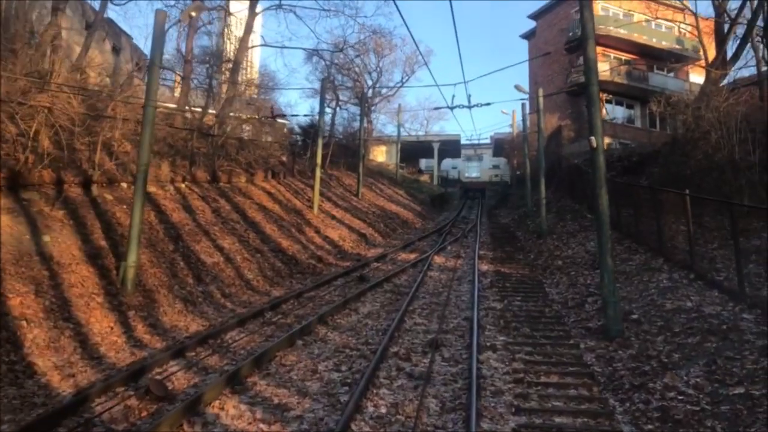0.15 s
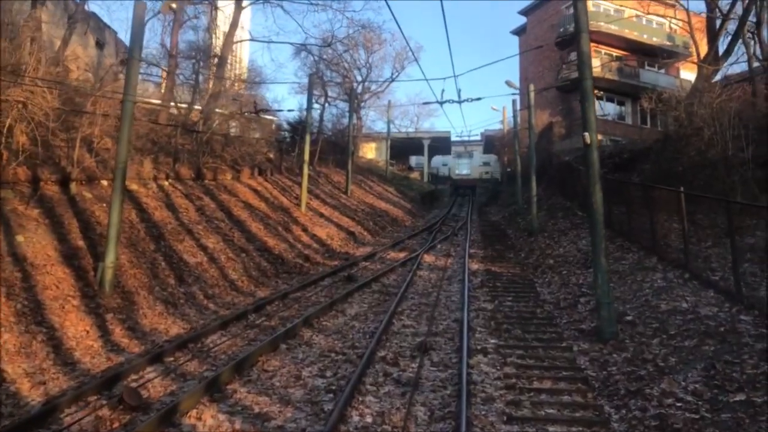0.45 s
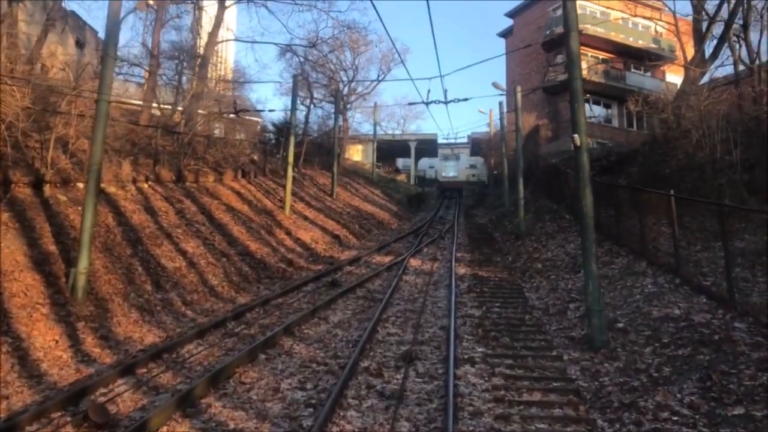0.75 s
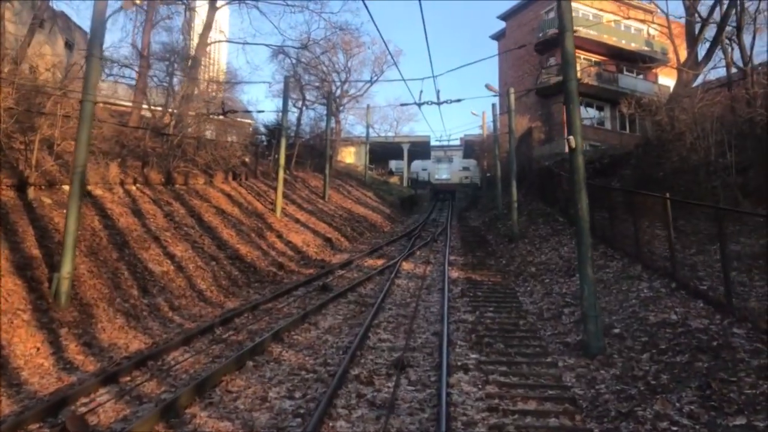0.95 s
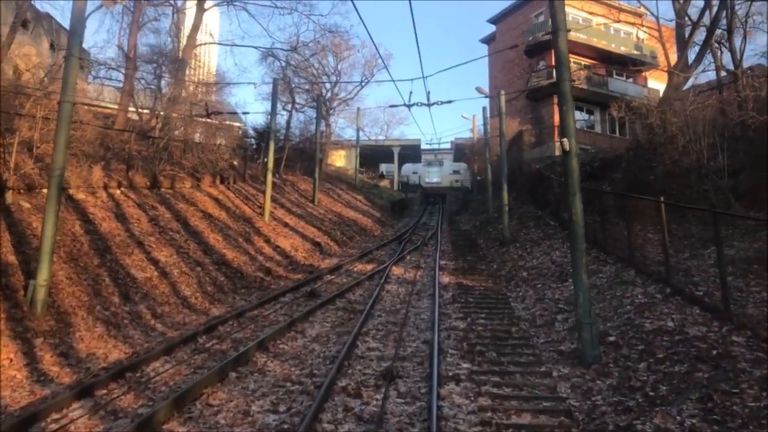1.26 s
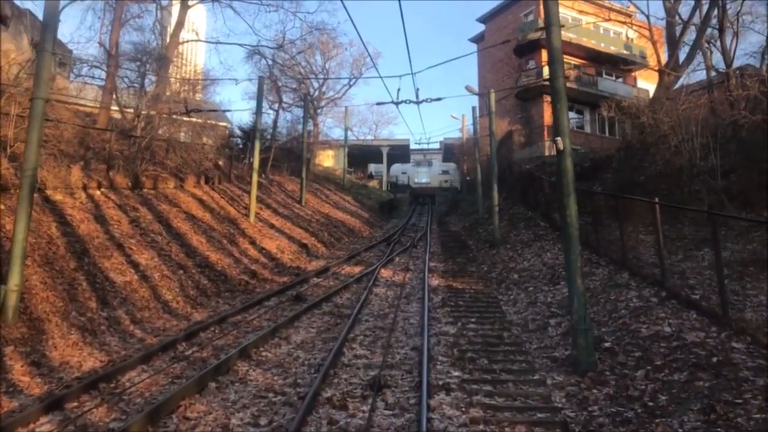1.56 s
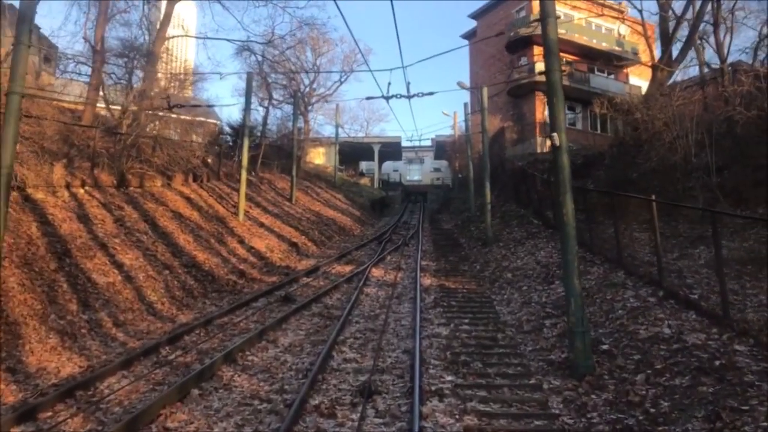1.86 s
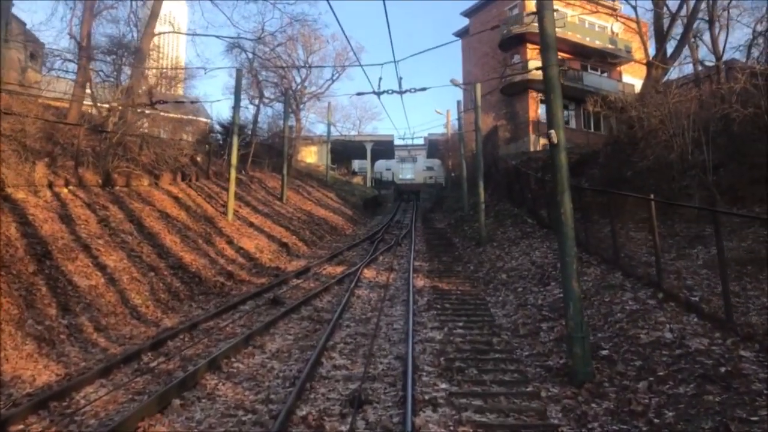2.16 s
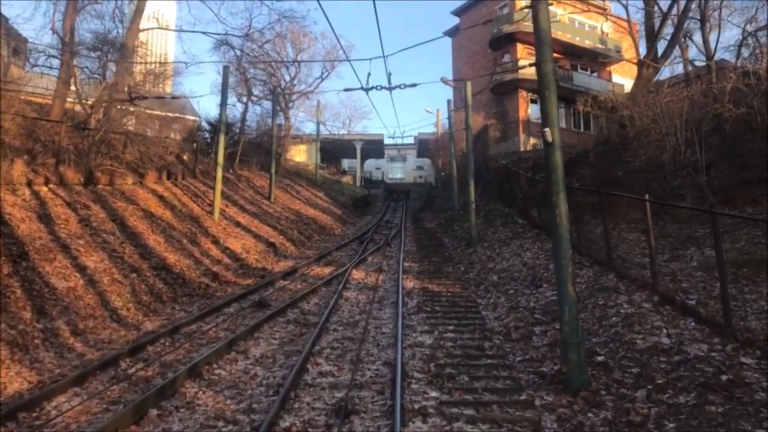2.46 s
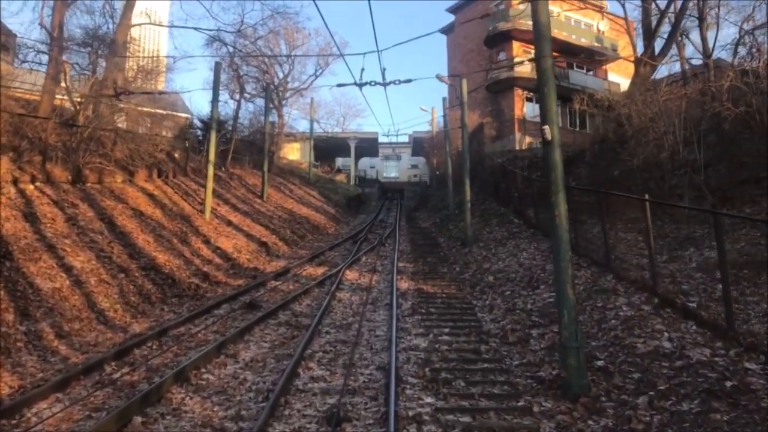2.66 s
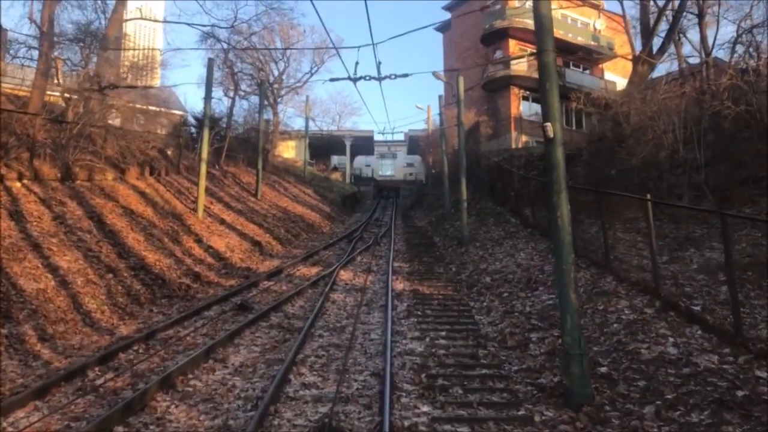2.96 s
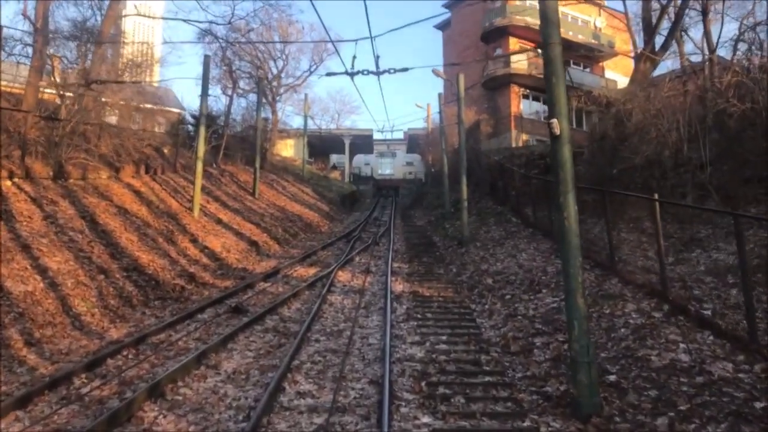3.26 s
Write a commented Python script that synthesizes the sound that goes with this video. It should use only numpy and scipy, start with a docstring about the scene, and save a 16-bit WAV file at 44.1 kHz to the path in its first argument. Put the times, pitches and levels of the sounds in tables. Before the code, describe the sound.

Funicular car rolling on rails, deep booming rumble with loose panel clatter, heard inside the cab

```python
"""Inside the front cab of a funicular car rolling along its track.
The wheels shake the body into a low rumble, resonant noise that swells and booms on bumps.
Loose panels knock and clatter in short bouts and jolts make the walls growl: random touches and noise ring modes.
Small fittings rattle brightly, as dense touches, over a fluttering noise of rolling and air.
Short unsteady tones, some like squeaks, sound faintly now and then: sines of wandering pitch and level."""
import sys
import numpy as np
from scipy import signal
from scipy.fft import rfft, irfft, next_fast_len
from scipy.io import wavfile
from scipy.ndimage import uniform_filter1d

SR = 44100
rng = np.random.default_rng(int(sys.argv[2]) if len(sys.argv) > 2 else 0)


def dump(signal):
    """Clip the signal to [-1, 1] and save it as 16-bit WAV at the path in sys.argv[1]."""
    limited = np.clip(np.atleast_2d(signal).T, -1, 1)
    pcm = np.round(limited * 32767).astype(np.int16)
    wavfile.write(sys.argv[1], SR, pcm)


N = 150381  # samples, about 3.4 s

# Spectrum of the car body's drone. Each row: frequency in Hz, relative density in dB per Hz.
BODY_SPECTRUM = [(30, -5.5), (42, 8), (62, 2), (85, 4.5), (115, -2), (160, -11), (250, -22), (400, -26),
                 (550, -50.5)]
# Resonances of the cab. Each row: centre in Hz, width in Hz of the narrower of two passes, level in dB.
CAB_RESONANCES = [(42.6, 22, -33), (61.2, 17, -33), (87.5, 22.6, -33), (207.6, 21, -41)]
BODY_DB, BODY_EVENNESS = -20.5, 0.45  # evenness: 0 leaves the swells of the noise, 1 flattens them
RUMBLE_LOW_CUT_HZ = 32

# Bumps that make the body boom. Each row: start in seconds, length in seconds, pitch in Hz, boom level in dB.
BUMPS = [(0.074, 0.027, 52, -21), (0.524, 0.032, 68, -16), (0.752, 0.11, 54, -14.5), (1.096, 0.11, 88, -19),
         (1.296, 0.021, 100, -13), (1.393, 0.038, 73.94, -16), (2.083, 0.1, 58, -18.5),
         (2.241, 0.038, 62, -17.5), (2.519, 0.065, 70, -18), (2.609, 0.075, 84.72, -8.5),
         (3.073, 0.039, 66, -16), (3.225, 0.081, 56, -14.5)]
BUMP_ATTACK_S, BUMP_DECAY_S = 0.01, 0.029
BUMP_WANDER_HZ, BUMP_SWELL = 14.23, 3.2  # spread of the pitch; gain of the drone beside the boom

# Spectrum of wheels on rails and air past the cab. Each row: frequency in Hz, relative density in dB per Hz.
ROLLING_SPECTRUM = [(200, -4), (380, 4), (550, -1), (850, 0), (1650, -7), (2200, -14), (4300, -20),
                    (4900, -29), (5600, -25), (6700, -31), (7800, -32), (9400, -27), (11000, -30),
                    (15900, -32)]
# Strength of the rush, before its flutter. Each row: time in seconds, level in dB.
ROLLING_LEVEL = [(0, -44), (0.299, -51.5), (.55, -41), (.92, -46.5), (1.35, -44.5), (1.63, -52.5),
                 (1.87, -49.5), (2.2, -45.5), (2.65, -41), (3.0, -49.5), (3.2, -48.5), (3.41, -44)]
ROLLING_FLUTTER_DB = 1.8
# Stray ticks of the fittings; TICK_DB is relative to the rush.
TICKS_PER_S, TICK_DECAY_S, TICK_SPREAD_DB, TICK_DB = 70, 0.0026, 3.5, -22.5

# Bouts of rattling. Each row: start in seconds, length in seconds, drive level in dB,
# extra drive of the sizzle in dB.
RATTLES = [(0.069, 0.0024, -49.5, 9), (0.281, 0.0057, -54, 9.5), (0.4, 0.03, -45, -9),
           (0.417, 0.045, -49.5, -3), (0.515, 0.013, -44.5, -4), (0.556, 0.061, -50, 1.5),
           (0.622, 0.0058, -46, -1.5), (0.635, 0.022, -63, 18), (0.714, 0.0073, -64.5, 21),
           (1.107, 0.003, -50.5, -2), (1.132, 0.025, -59, 10.5), (1.353, 0.032, -65, 16.5),
           (1.476, 0.011, -65, 16.5), (1.579, 0.04, -61, 8.5), (1.731, 0.029, -59.5, 4.5),
           (2.308, 0.072, -60.5, -4), (2.481, 0.0087, -44, -3), (2.507, 0.017, -52, -1.5),
           (2.601, 0.017, -46, -2), (2.73, 0.0066, -50.5, 1.5), (2.942, 0.028, -71.5, 17.5),
           (3.142, 0.0053, -57.5, 5), (3.224, 0.039, -58.5, 8.5), (3.273, 0.07, -51.5, -12)]
RATTLE_ATTACK_S, RATTLE_DECAY_S, RATTLE_PER_S, RATTLE_SPREAD_DB = 0.0042, 0.0069, 5100, -4
RATTLE_TAIL_S, RATTLE_TAIL_DB = 0.065, -9.5  # tail level relative to the touches
RATTLE_FLUTTER_DB, SIZZLE_FROM_HZ = 1.8, 9100
# Spectrum of the small fittings. Each row: frequency in Hz, relative density in dB per Hz.
FITTING_SPECTRUM = [(600, -12), (1800, 3), (3300, 6), (4300, 3), (5000, -1), (6700, 1), (8000, -3),
                    (9400, -2), (10700, -6), (12500, -5), (15900, -4)]

# Bouts of panel clatter. Each row: start in seconds, length in seconds, drive level in dB.
CLATTERS = [(.116, 0.058, -39.5), (.328, 0.029, -42.5), (.402, 0.035, -36), (.483, 0.084, -41),
            (.625, 0.046, -37), (.737, 0.0072, -39), (.828, 0.08, -42), (1.005, 0.012, -40.5),
            (1.11, 0.084, -47), (1.19, 0.11, -44.5), (1.441, 0.017, -40.5), (1.52, 0.031, -47),
            (1.695, 0.016, -42.5), (1.765, 0.011, -44.5), (1.909, 0.026, -42), (1.965, 0.018, -43.5),
            (2.047, 0.0068, -36), (2.225, 0.018, -46), (2.302, 0.024, -38), (2.49, 0.04, -41),
            (2.574, 0.042, -36.5), (2.685, 0.053, -43), (2.807, 0.015, -40.5), (2.87, 0.022, -42.5),
            (2.96, 0.025, -49), (3.044, 0.093, -45.5), (3.232, 0.12, -40.5), (3.284, 0.035, -36),
            (3.37, 0.055, -50)]
CLATTER_ATTACK_S, CLATTER_DECAY_S, CLATTER_PER_S, CLATTER_SPREAD_DB = 0.0016, 0.032, 1300, 0
# Spectrum of the panels. Each row: frequency in Hz, relative density in dB per Hz.
PANEL_SPECTRUM = [(150, -20), (350, 2), (550, -4), (850, 0), (1200, -4), (1650, -6), (2200, -15),
                  (3200, -22), (4300, -24), (4900, -34), (6700, -38), (16000, -44)]
# Modes of the panels. Each row: frequency in Hz, width in Hz, peak gain in dB beside the direct shaking.
PANEL_MODES = [(494, 10, 0), (987, 6.3, -5.5), (1312, 13, -1), (1626, 16, 0), (2385, 38, 0.5),
               (3266, 17, 4.5)]

# Single knocks of a loose panel. Each row: start in seconds, ring frequency in Hz, level in dB.
KNOCKS = [(0.13, 1080, -44), (0.856, 1140, -36), (0.872, 940, -35), (1.208, 1000, -39.5), (1.37, 1126, -42),
          (2.063, 994, -39.5), (2.328, 938, -34), (2.525, 940, -36), (2.578, 1623, -39)]
KNOCK_DECAY_S, KNOCK_CRACK_S = 0.0094, 0.005
KNOCK_OVERTONE, KNOCK_OVERTONE_DB = 1.5, -1.5  # frequency ratio and level relative to the first mode

# Short unsteady tones, some like squeaks. Each row: start in seconds, length in seconds, pitch in Hz, level in dB.
TONES = [(0.212, .062, 2870, -55.5), (0.246, 0.02, 1790, -54), (.25, .018, 2400, -59),
         (.55, 0.12, 15400, -59), (0.708, .03, 15700, -48), (0.822, 0.018, 2100, -47),
         (.842, .02, 3030, -50.5), (.845, .018, 2450, -51), (1.316, 0.099, 15140, -53.5),
         (1.47, 0.028, 2900, -55.5), (2.455, 0.014, 1630, -44), (2.538, .013, 2760, -50),
         (2.67, 0.035, 1640, -44.5), (2.688, .014, 2570, -52), (2.71, .04, 1780, -46),
         (3.026, .055, 2875, -47), (3.041, 0.092, 1785, -48)]
TONE_ATTACK_S, TONE_DECAY_S = 0.01, 0.017
TONE_WOBBLE_HZ, TONE_ROUGH_DB = 42, 3.8  # spreads of pitch and level

# Jolts that make the cab walls judder. Each row: start in seconds, length in seconds, centre in Hz, level in dB.
JUDDERS = [(0.49, 0.17, 166, -33.5), (0.821, 0.07, 204, -29), (1.312, 0.028, 186, -29.5),
           (2.597, 0.06, 384, -38), (3.256, 0.031, 193, -36)]
JUDDER_WIDTH_HZ = 90  # width of each of two passes

CUTOFF_HZ = 15900


def from_db(db):
    """Amplitude gain is ten to the power of decibels over twenty."""
    return 10 ** (np.asarray(db) / 20)


def rms_one(x):
    """Normalisation: dividing by the root mean square gives unit power."""
    return x / np.sqrt(np.mean(x ** 2) + 1e-20)


def seconds():
    """Sampled time: each sample lies one period after the last."""
    return np.arange(N) / SR


def coloured(x, points):
    """Spectral shaping: x takes a smooth colour that falls away beyond both ends, at unit power."""
    hz, db = np.transpose(points)
    size = next_fast_len(N + SR // 2)
    f = np.maximum(np.fft.rfftfreq(size, 1 / SR), 1)
    skirts = (np.minimum(f / hz[0], 1) * np.minimum(hz[-1] / f, 1)) ** 2
    colour = from_db(np.interp(np.log(f), np.log(hz), db))
    return rms_one(irfft(rfft(x, size) * skirts * colour, size)[:N])


def drift(rate):
    """Low-pass noise: two equal poles at rate (Hz) leave a random wander of spread 1."""
    r = np.exp(-2 * np.pi * rate / SR)
    noise = rng.standard_normal(N + SR)
    # the first second lets the filter settle
    return rms_one(signal.lfilter([1], [1, -2 * r, r * r], noise)[SR:])


def resonate(x, hz, width):
    """Resonance: a pole pair passes a band of the given width with unit gain at its top."""
    r = np.exp(-np.pi * width / SR)
    zeros = np.array([1, 0, -1]) * (1 - r * r) / 2
    poles = [1, -2 * r * np.cos(2 * np.pi * hz / SR), r * r]
    return signal.lfilter(zeros, poles, x)


def envelope(start, length, attack, decay):
    """Damped excitation: a linear rise, a hold until length after the start, an exponential decay."""
    t = seconds() - start
    return np.clip(t / attack, 0, 1) * np.exp(-np.clip((t - length) / decay, 0, 20))


def bouts(rows, attack, decay):
    """Superposition of incoherent sources: the powers of overlapping bouts add."""
    powers = [(from_db(db) * envelope(s, length, attack, decay)) ** 2 for s, length, db in rows]
    return np.sqrt(sum(powers))


def contacts(per_s, spread_db):
    """Impulse noise: touches of random sign at random instants; spread_db makes their strength uneven."""
    strengths = from_db(spread_db * np.minimum(rng.exponential(1, N), 4))
    signed = strengths * rng.choice([-1, 1], N)
    return rms_one(signed * (rng.random(N) < per_s / SR))


def panel_ring(x):
    """Modal response: the direct shaking plus the ring of each panel mode."""
    return x + sum(from_db(db) * resonate(x, hz, width) for hz, width, db in PANEL_MODES)


def rumble():
    """Forced vibration: body and cab drone on noise; each bump adds a boom and swells the drone."""
    body = from_db(BODY_DB) * coloured(rng.standard_normal(N), BODY_SPECTRUM)
    for hz, width, db in CAB_RESONANCES:
        narrow = resonate(rng.standard_normal(N + SR), hz, width)
        body = body + from_db(db) * rms_one(resonate(narrow, hz, 4 * width)[SR:])
    # dividing by part of the running level evens out the drone
    power = uniform_filter1d(uniform_filter1d(rms_one(body) ** 2, size=2200), size=2200)
    body = body / np.sqrt(power) ** np.clip(BODY_EVENNESS, 0, 1)
    out, wander = body, BUMP_WANDER_HZ * drift(25.67)
    for s, length, hz, db in BUMPS:
        boom = np.sqrt(2) * np.sin(2 * np.pi * np.cumsum(hz + wander) / SR)
        strength = from_db(db) * envelope(s, length, BUMP_ATTACK_S, BUMP_DECAY_S)
        out = out + strength * (boom + BUMP_SWELL * body)
    low_cut = signal.butter(6, RUMBLE_LOW_CUT_HZ, "high", fs=SR, output="sos")
    return signal.sosfilt(low_cut, out)


def rolling():
    """Broadband noise of wheels and air, modulated at random; its level also scales the stray ticks."""
    level_db = np.interp(seconds(), *np.transpose(ROLLING_LEVEL)) + ROLLING_FLUTTER_DB * drift(23)
    rush = coloured(panel_ring(rng.standard_normal(N)), ROLLING_SPECTRUM)
    strikes = np.abs(contacts(TICKS_PER_S, TICK_SPREAD_DB))
    decays = signal.lfilter([1], [1, -np.exp(-1 / (TICK_DECAY_S * SR))], strikes)
    ticks = coloured(decays * rng.standard_normal(N), FITTING_SPECTRUM)
    return from_db(level_db) * (rush + from_db(TICK_DB) * ticks)


def rattle():
    """Repeated impact: small fittings buzz and sizzle unevenly, with a short smooth tail in the cab."""
    buzz = [(s, length, db) for s, length, db, extra in RATTLES]
    sizzle = [(s, length, db + extra) for s, length, db, extra in RATTLES]
    out = 0
    for rows, side in ((buzz, "low"), (sizzle, "high")):
        touches = coloured(contacts(RATTLE_PER_S, RATTLE_SPREAD_DB), FITTING_SPECTRUM)
        touches = bouts(rows, RATTLE_ATTACK_S, RATTLE_DECAY_S) * touches
        tail = coloured(rng.standard_normal(N), FITTING_SPECTRUM)
        tail = bouts(rows, RATTLE_ATTACK_S, RATTLE_TAIL_S) * tail
        band = signal.butter(3, SIZZLE_FROM_HZ, side, fs=SR, output="sos")
        out = out + signal.sosfilt(band, touches + from_db(RATTLE_TAIL_DB) * tail)
    return out * from_db(RATTLE_FLUTTER_DB * drift(60))


def clatter():
    """Repeated impact exciting modes: loose panels chatter against their frames."""
    effort = bouts(CLATTERS, CLATTER_ATTACK_S, CLATTER_DECAY_S)
    touches = effort * contacts(CLATTER_PER_S, CLATTER_SPREAD_DB)
    # colouring sets unit power, so the power of the effort is put back
    return np.sqrt(np.mean(effort ** 2)) * coloured(panel_ring(touches), PANEL_SPECTRUM)


def knocks():
    """Single impact: a panel hits its frame with a short crack and two quickly damped modes."""
    out, crack = np.zeros(N), coloured(rng.standard_normal(N), PANEL_SPECTRUM)
    for s, hz, db in KNOCKS:
        phase = 2 * np.pi * hz * (seconds() - s)
        ring = np.sin(phase) + from_db(KNOCK_OVERTONE_DB) * np.sin(KNOCK_OVERTONE * phase)
        ring = ring * envelope(s, CLATTER_ATTACK_S, CLATTER_ATTACK_S, KNOCK_DECAY_S)
        out += from_db(db) * (ring + crack * envelope(s, 0, CLATTER_ATTACK_S, KNOCK_CRACK_S))
    return out


def short_tones():
    """Frequency and amplitude modulation: each sine wanders in pitch and level, some like squeaks."""
    out = np.zeros(N)
    for s, length, hz, db in TONES:
        pitch = hz + TONE_WOBBLE_HZ * drift(133)
        tone = np.sin(2 * np.pi * np.cumsum(pitch) / SR)
        rough = rms_one(tone * from_db(TONE_ROUGH_DB * drift(55)))
        out += from_db(db) * envelope(s, length, TONE_ATTACK_S, TONE_DECAY_S) * rough
    return out


def judder():
    """Resonance under a jolt: noise through a wall resonance makes a short hollow growl."""
    out = np.zeros(N)
    for s, length, hz, db in JUDDERS:
        wall = resonate(rng.standard_normal(N), hz, JUDDER_WIDTH_HZ)
        wall = resonate(wall, hz, JUDDER_WIDTH_HZ)
        out += from_db(db) * envelope(s, length, BUMP_ATTACK_S, BUMP_DECAY_S) * rms_one(wall)
    return out


def scene():
    """Linear superposition: the pressures of all sources add in the cab, in one channel."""
    return (rumble() + rolling() + rattle() + clatter() + knocks() + short_tones() + judder())[None]


def record(dry):
    """Low-pass filtering: an elliptic filter cuts the top steeply."""
    top_cut = signal.ellip(12, 0.1, 80, CUTOFF_HZ, fs=SR, output="sos")
    return signal.sosfilt(top_cut, dry)


dry = scene()
out = record(dry)
dump(out)
```